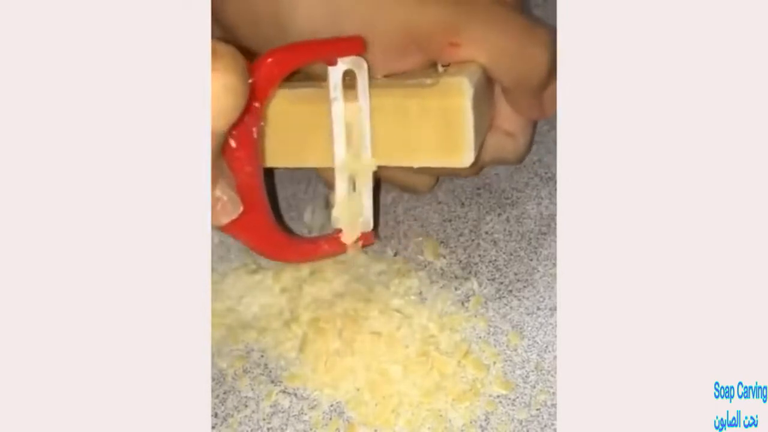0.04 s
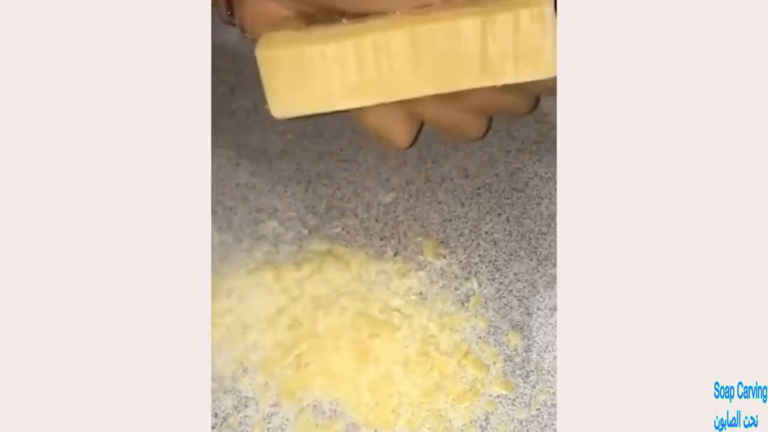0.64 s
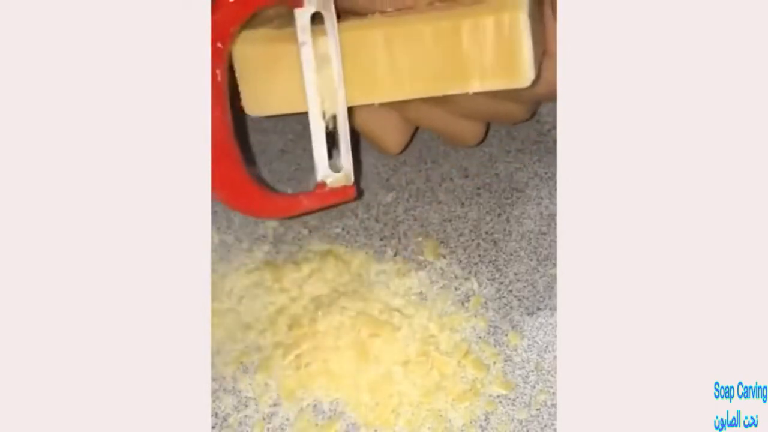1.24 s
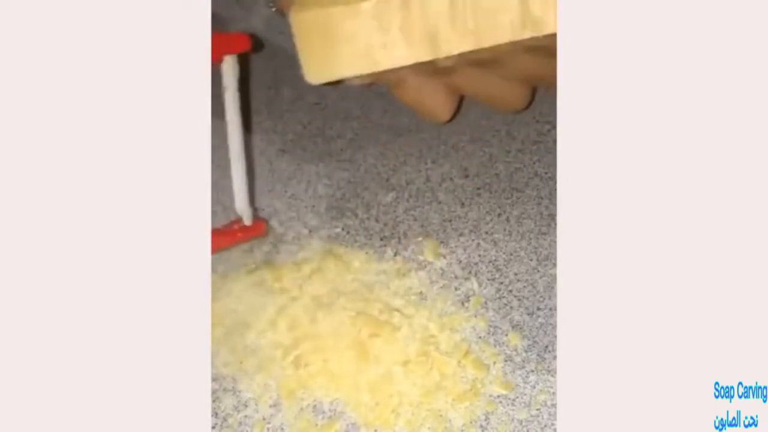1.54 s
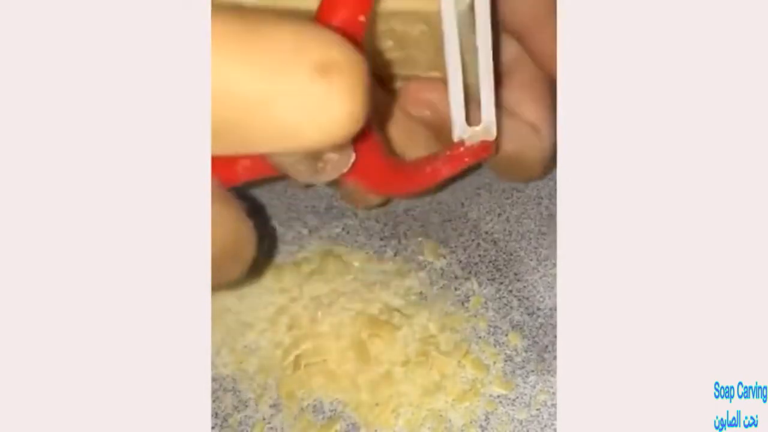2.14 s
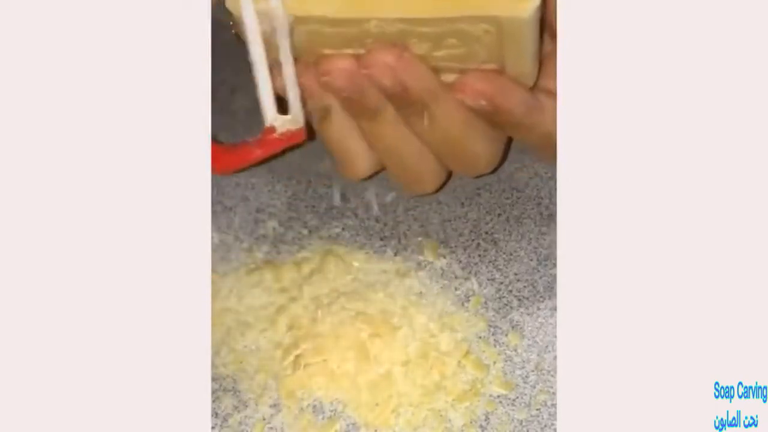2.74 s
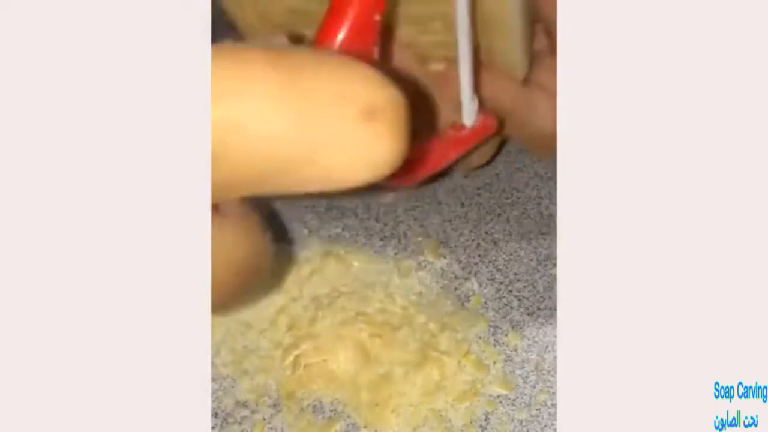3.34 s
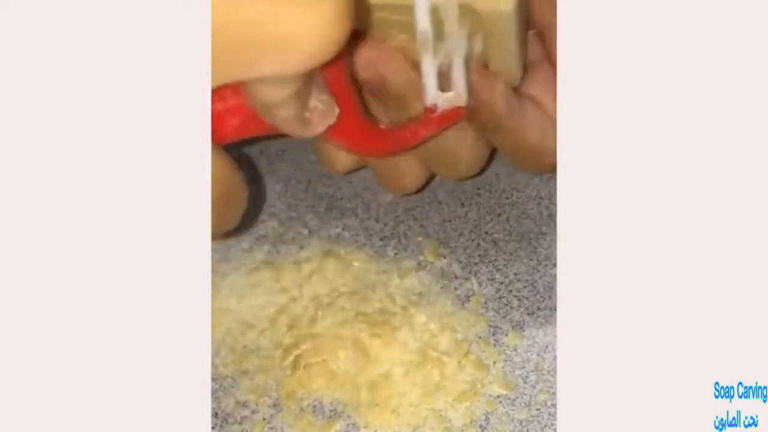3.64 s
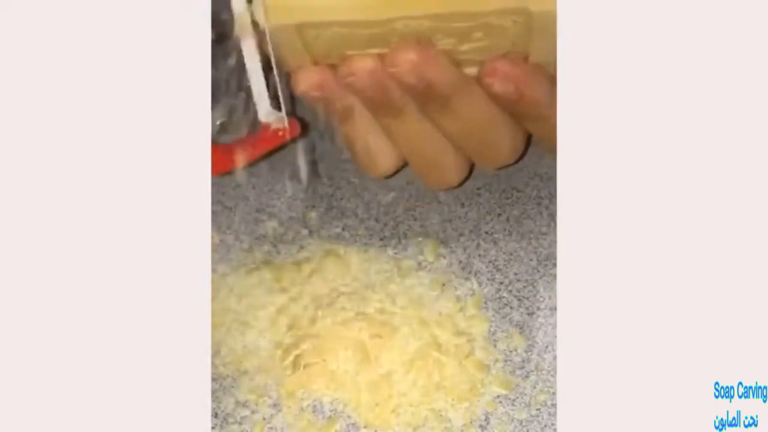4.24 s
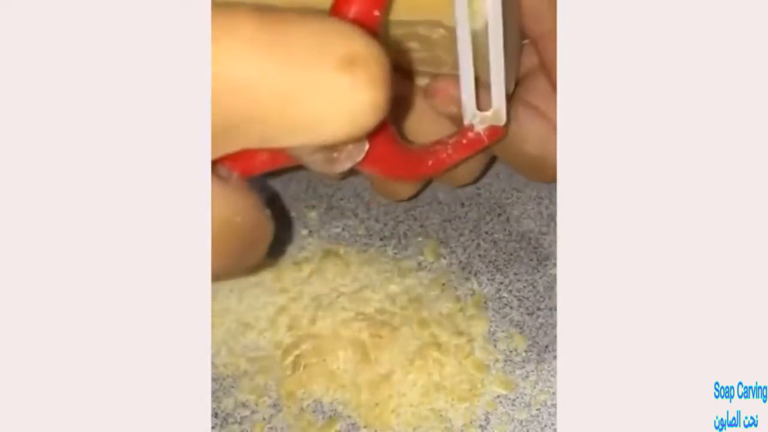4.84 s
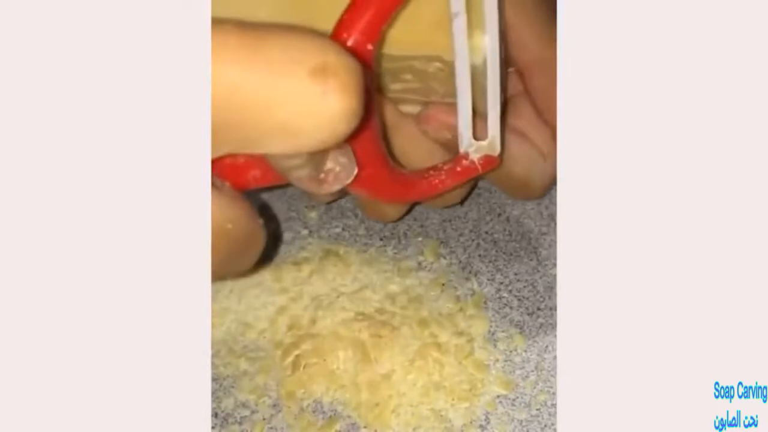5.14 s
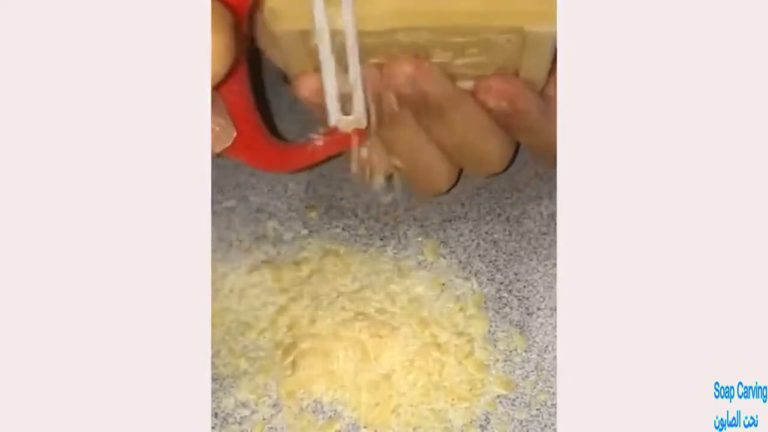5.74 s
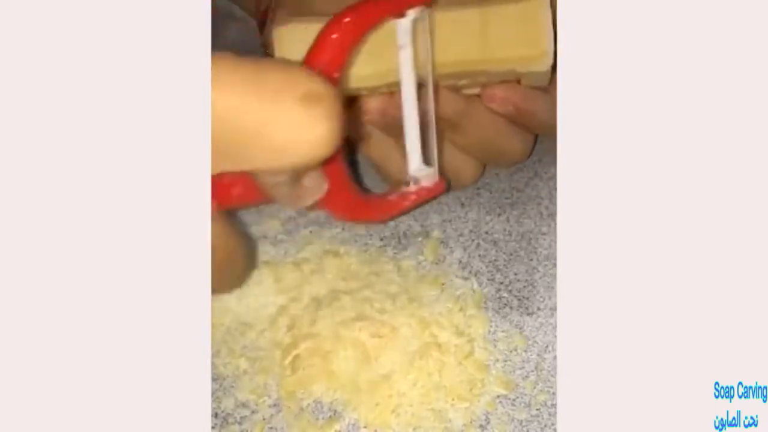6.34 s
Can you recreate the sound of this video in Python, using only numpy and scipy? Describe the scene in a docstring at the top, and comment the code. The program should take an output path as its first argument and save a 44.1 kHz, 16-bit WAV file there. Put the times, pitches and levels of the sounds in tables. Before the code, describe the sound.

Close, gritty rasps of a peeler shaving hard soap, broken by brief pauses, small cracks and sharp blade clicks.

```python
"""A swivel peeler shaves a hard, dry bar of soap held in the hand, close by in a small quiet room.
Dense tiny brittle fractures excite the resonances of peeler and bar, and stick-slip friction makes
the blade catch and chatter. Chips snap off, the bar knocks dully, and the loose blade clacks in its
plastic frame as it lands on the bar and leaves it. Faint air noise and mains hum lie underneath."""
import sys
import numpy as np
from scipy import signal
from scipy.fft import rfft, irfft
from scipy.io import wavfile
from scipy.ndimage import uniform_filter1d

SR = 44100
rng = np.random.default_rng(int(sys.argv[2]) if len(sys.argv) > 2 else 0)


def master(y):
    """Save y as 16-bit WAV."""
    cut = np.clip(np.atleast_2d(y).T, -1, 1)
    pcm = np.round(cut * 32767)  # scale
    wavfile.write(sys.argv[1], SR, pcm.astype(np.int16))


N = 282240
TIME = np.arange(N) / SR
CUTOFF_HZ = 13900


def scrape(strokes, colour, resonances, fractures_per_s, size_db, slips_per_s, slip_db,
           powder, gain_db, chatter_db, edge_s, rounding):
    """Source and filter: tiny fractures, bunched by stick and slip, excite peeler and bar."""
    touching, pressure, body_gain, catch_strength = bite(strokes, rounding, edge_s)
    sizes = from_db(size_db * np.minimum(rng.exponential(1, N), 4)) * rng.choice([-1, 1], N)
    fractures = rms_one(sizes * (rng.random(N) < fractures_per_s / SR))
    force = (fractures + powder * rng.standard_normal(N)) * from_db(slip_db * drift(slips_per_s))
    vibration = coloured(force, colour, resonances)
    blade = signal.sosfilt(signal.butter(4, 2700, "high", fs=SR, output="sos"), vibration)
    bar = signal.sosfilt(signal.butter(5, 2700, "low", fs=SR, output="sos"), vibration)
    sound = rms_one(blade) + body_gain * rms_one(bar)
    surges = stick_slip(catch_strength, chatter_db)
    return sound * touching * np.hypot(from_db(gain_db) * pressure, surges)


def edge_scrape():
    """Brittle fracture: the blade crumbles the crust of the bar's narrow edge."""
    # pushes: t/s, rise/s, fall/s, level/dB, swell/dB, fade/dB, relative body/dB, relative catches/dB
    strokes = [(0, .004, 0.091, -55, -4, 7.5, -6, 1.5), (.108, .17, .024, -30, 41, 24, -7, -6.5)]
    colour = [(100, -8.5), (400, -6.5), (1200, -3.5), (3000, -8), (4800, 3.5), (6800, 1), (10000, -1),
              (14000, 1)]  # spectral envelope: f/Hz, level/dB
    resonances = [(703, 43, 12), (1480, 200, 5.5), (2150, 390, 7.5), (3910, 460, 8.5), (5430, 390, 7),
                  (5940, 800, 4.5), (8200, 210, 8.5), (9480, 350, 9), (10460, 330, 2), (11570, 314, 9)]  # peeler and bar: f/Hz, width/Hz, lift/dB
    return scrape(strokes, colour, resonances, fractures_per_s=4000, size_db=2, slips_per_s=220,
                  slip_db=3, powder=.91, gain_db=-2.5, chatter_db=-3.5, edge_s=.004, rounding=1.05)


def smooth_scrape():
    """Friction-driven resonance: the blade glides over the fresh cut and nearly squeaks."""
    strokes = [(.87, 0.059, 0.082, -56.5, 8.8, 16.6, -7, 0), (1.062, 0.14, 0.0074, -27, 31.2, 20, -6.5, 0)]  # pushes: columns as in edge_scrape
    colour = [(100, -16), (400, -13.5), (1500, -13), (3400, -12.5), (4800, 0.5), (6400, 0), (10000, 5),
              (14000, 0)]  # spectral envelope: f/Hz, level/dB
    resonances = [(678, 32, 8.9), (1180, 310, 9.8), (1940, 380, 4.5), (4160, 750, 12), (5460, 210, 17),
                  (8200, 820, 5.7), (10740, 400, 6.3), (11480, 290, 9.6), (13100, 540, 7.2)]  # peeler and bar: f/Hz, width/Hz, lift/dB
    return scrape(strokes, colour, resonances, fractures_per_s=6000, size_db=3, slips_per_s=450,
                  slip_db=1.5, powder=.93, gain_db=-3, chatter_db=-11.5, edge_s=.0057, rounding=.91)


def face_scrape():
    """Brittle fracture along the broad face: more uneven breaks give a coarser grain."""
    strokes = [(2.045, 0.086, .09, -51.5, 4.4, 4.6, -7.5, 1), (2.225, 0.091, .1, -51.5, 3.3, 4.5, -7, -3),
               (2.425, 0.12, 0.055, -44, 15, 14.3, -3, 2.5), (3.366, 0.0061, 0.018, -35, 12.8, 9.4, -7, 2),
               (3.391, 0.018, 0.15, -41, 9.4, 30, -6.5, 6), (3.592, .01, 0.017, -48.5, 4.5, 12, -6, 6),
               (3.625, 0.12, 0.027, -53.5, 2, 42, -6.5, 1), (3.918, 0.017, 0.063, -32, 1, 20, -5, 6),
               (5.008, 0.011, 0.031, -37, 1.1, 21, -5.5, 8), (5.2, .17, 0.055, -54.5, 0.67, 5, -6, 7.5),
               (5.442, 0.082, 0.084, -43.5, 12.7, 20.7, -1, 0),
               (5.66, 0.037, 0.042, -56, 8.1, 9.6, -4.5, 7.5),
               (5.748, 0.029, 0.017, -47, 12, 12.5, -18, -6), (6.24, 0.16, .02, -68, 2, 1, -6.5, 12)]  # pushes: columns as in edge_scrape
    colour = [(100, -5), (450, -6.5), (1400, -7), (2900, -7.5), (4500, 5.5), (6400, 6.5), (9000, 8.5),
              (14000, 7.5)]  # spectral envelope: f/Hz, level/dB
    resonances = [(745, 67, 11.9), (1017, 170, 7.1), (1896, 130, 8.9), (2165, 130, 9.9), (3140, 110, 2.4),
                  (3494, 230, 6.8), (4037, 300, 14.2), (5315, 350, 10), (9060, 220, 4), (10330, 2200, 6.3)]  # peeler and bar: f/Hz, width/Hz, lift/dB
    return scrape(strokes, colour, resonances, fractures_per_s=4200, size_db=4, slips_per_s=190,
                  slip_db=1.1, powder=.62, gain_db=-1, chatter_db=-7.5, edge_s=.0012, rounding=.91)


def bite(strokes, rounding, edge_s, body_limit_db=-47.5):
    """Amplitude envelopes of the pushes: contact, pressure, the bar's share and the catches' strength."""
    out = np.zeros((4, N))
    for start, rise, fall, peak_db, swell_db, fade_db, body_db, catch_db in strokes:
        t = TIME - start
        touching = np.clip(np.minimum(t, rise + fall - t) / edge_s + 1, 0, 1)
        on = touching > 0
        to_go = np.clip(1 - t[on] / rise, 0, 1)
        gone = np.clip((t[on] - rise) / fall, 0, 1)
        level_db = peak_db - swell_db * to_go ** rounding - fade_db * gone ** rounding
        # the hand damps the bar: past the limit a deeper bite only gets brighter
        body = from_db(body_db) / np.hypot(1, from_db(level_db + body_db - body_limit_db))
        out[:, on] = touching[on], from_db(level_db), body, from_db(level_db + catch_db)
    return out


def stick_slip(catch_strength, chatter_db, catches_per_s=40, rise_s=.001, fall_s=.0035, count=600):
    """Relaxation oscillation: the edge sticks and jerks free, each catch ending in a quick surge."""
    # steady chatter where the soap is hardest: t/s, length/s, interval/s, level/dB
    chatters = [(0.1095, .073, 0.017, -32), (1.113, .012, .025, -26), (2.066, .105, .03, -36.5),
                (2.29, .118, 0.024, -37), (3.476, .04, 0.045, -29.5), (3.633, .084, 0.018, -28.5),
                (5.243, .156, .0208, -31.5), (5.4648, .033, 0.017, -31.5), (5.581, .027, 0.019, -41.5)]
    catches, t = np.zeros(N), np.arange(2048) / SR
    gaps, sizes = rng.standard_normal((2, count))
    times = np.cumsum(np.exp(.28 * gaps)) / catches_per_s  # light catches come at an uneven pace
    for s, db in zip(times[times < TIME[-1]], 3 * np.clip(sizes, -2, 1)):
        add(catches, s, from_db([db]))
    catches *= catch_strength * from_db(3.5)
    for start, length, interval, level_db in chatters:
        beats = np.arange(start, start + length, interval)
        for s, (late, harder) in zip(beats, rng.standard_normal((count, 2))):
            add(catches, s + .0005 * late, from_db([level_db + chatter_db + .6 * harder]))
    surge = (1 - np.exp(-t / rise_s)) * np.exp(-t / fall_s)
    return signal.fftconvolve(catches, surge)[:N]


def clacks():
    """Impact: the blade hits its stop and rings with the frame. Returns direct sound and room feed."""
    # t/s, level/dB, lower ring f/Hz, upper ring f/Hz, low weight/dB, top weight/dB, contact/s
    impacts = [(0.279, -22.5, 5680, 8600, -16.5, 1, 0.0049), (0.7848, -43, 5470, 11550, -19, -10, 0.0028),
               (0.7974, -33, 5070, 11200, -12.5, 0, 0.0034), (1.8747, -38.5, 3840, 9340, -22, -1, 0.0028),
               (2.664, -33, 5140, 10700, -18.5, -2, .0027), (3.2049, -32, 6200, 12100, -9, 10, 0.0026),
               (3.904, -28, 3950, 9200, -8.5, -2.5, 0.0031), (3.9194, -20.5, 5500, 11400, -21.5, 4, .002),
               (3.926, -20, 4960, 11500, -10, 0.5, 0.0016), (3.936, -27, 4960, 11370, -4.5, 1.5, 0.0033),
               (4.1072, -15.5, 7180, 13000, -18, 4.5, .0008), (4.558, -37.5, 6410, 11560, -17, 6.5, 0.0014),
               (5.006, -19, 5120, 10700, -18.5, -4, .002), (5.0203, -26, 5200, 10350, -18, -3.5, .0015),
               (6.2324, -28.5, 5630, 10530, -18, 4.5, 0.0047)]
    colour = [(100, -35), (700, -10), (1900, -10.5), (2700, -7.5), (4600, 5.5), (7500, 0.5), (10500, 5),
              (14000, 0)]  # spectral envelope: f/Hz, level/dB
    frame = [(2030, 250, 5.5)]  # plastic frame: f/Hz, width/Hz, lift/dB
    beamed, spread = np.zeros((2, N))
    for s, level_db, lower_hz, upper_hz, low_db, top_db, length in impacts:
        blade = [(lower_hz, 400, 12.5), (upper_hz, 800, 10)]  # columns as for the frame
        contact = burst(length, rattle_db=-10, rattle_s=1.8 * length)
        # the thin blade's rings are directional and stay out of the room
        for out, resonances in ((beamed, [*frame, *blade]), (spread, frame)):
            knock = coloured(contact, colour, resonances)
            add(out, s, from_db(level_db) * voiced(knock, low_db - 1, top_db))
        frame_db = level_db - 12 - 3500 * length  # a longer, softer contact rings the frame less
        add(beamed, s, ring(frame_db, hz=1880, t60=.026))
        add(beamed, s, ring(level_db - 16, lower_hz, t60=.015))  # the blade's lingering ping
    return beamed, from_db(-2.5) * band(spread, 5170, CUTOFF_HZ, order=2)  # mostly treble spreads


def chips():
    """Sudden release of strain: each chip of soap breaks away with a short dry crack."""
    snaps = [(.011, -44, -2), (0.0554, -39, 9), (0.1285, -45, -5), (0.1426, -44, -1), (.1916, -34.5, 6),
             (0.2152, -35.5, -4), (.233, -34.5, -6), (0.3394, -32, 3.5), (1.5457, -55.5, 6),
             (1.8922, -45, -4), (2.6015, -39.5, 6), (3.1793, -42, -5), (3.326, -51.5, 4.5),
             (3.6896, -41, 5), (3.822, -55, 9.5), (3.864, -44.5, 21), (4.1024, -34.5, 2.5),
             (4.1302, -34.5, 3), (4.1737, -53.5, 10.5), (4.546, -43.5, -10), (4.6241, -48, -6.5),
             (5.261, -37, 11), (5.771, -41, 0.5)]  # t/s, level/dB, crispness (top over middle)/dB
    colour = [(100, -20), (450, -7), (1000, -6), (2500, -9), (5000, 11), (7000, 0.5), (11000, 7.5),
              (14000, 4)]  # spectral envelope: f/Hz, level/dB
    out = np.zeros(N)
    for s, level_db, crisp_db in snaps:
        length = .0016 * from_db(-.23 * crisp_db)  # a crisper chip breaks faster
        body_db = -10.5 + .36 * crisp_db  # and rings the blade less, so its low body stands out
        crack = coloured(burst(length, rattle_db=-8, rattle_s=.0092), colour)
        add(out, s, from_db(level_db) * voiced(crack, body_db, crisp_db))
    return out


def knocks():
    """Modal damping: the blade is set down and the bar rings dully, damped by the hand."""
    landings = [(4.13, -40), (4.19, -55.5), (4.234, -53), (5.199, -28.5)]  # t/s, level/dB
    bar_modes = [(783, -5, 0.033), (970, -13.5, .02), (1230, -2, 0.013), (1580, -8, 0.011)]  # f/Hz, relative level/dB, T60/s
    out = np.zeros(N)
    for s, level_db in landings:
        for k, (hz, db, t60) in enumerate(bar_modes):
            add(out, s, (-1) ** k * ring(level_db + db, hz, t60))
    return out


def ticks():
    """Free vibration: short pitched ticks and pings of the frame or blade, one mode each, heard dry."""
    pings = [(0.339, -33.5, 2520, 0.022), (1.546, -58.5, 2080, .029), (1.743, -60, 1670, 0.022),
             (1.79, -59, 1880, .029), (3.18, -52, 1900, 0.062), (3.936, -42.5, 2926, 0.18),
             (4.109, -26, 3050, 0.013), (5.021, -46, 5410, 0.16), (6.234, -30.5, 5520, 0.033)]  # t/s, level/dB, f/Hz, T60/s
    out = np.zeros(N)
    for s, level_db, hz, t60 in pings:
        add(out, s, ring(level_db, hz, t60))
    return out


def room(x, build_s=.002):
    """Reverberation: diffuse reflections build up quickly and die away, slowest in the bass."""
    colour = [(200, -30.5), (800, -13.5), (2000, -13), (2950, -5), (3800, -10), (4700, -21), (5500, -19),
              (7000, -19.5), (10000, -20.5), (13500, -16)]  # response of the room: f/Hz, level/dB
    decay_times = [(200, 0.66), (3500, 0.42), (8000, 0.54), (14000, .45)]  # f/Hz, T60/s
    t = np.arange(SR) / SR
    edges = np.geomspace(150, 16000, 9)
    tail = 0
    for low, high in zip(edges, edges[1:]):
        t60 = at_hz(decay_times, np.sqrt(low * high))
        envelope = from_db(-60 * t / t60) * (1 - np.exp(-t / build_s))
        tail += band(rng.standard_normal(SR), low, high) * envelope / np.sqrt(np.sum(envelope ** 2))
    return signal.fftconvolve(x, coloured(tail, colour))[:N]


def background():
    """Noise floor: still air, a rumble as the hands move, mains hum and two faint passing tones."""
    air_colour = [(15, -34), (25, 2), (70, -4), (104, -9), (195, -14.5), (441, -16), (727, -21.5),
                  (807, -15.5), (921, -25.5), (997, -23), (1830, -27.5), (13500, -30)]  # spectrum of still air: f/Hz, relative level/dB
    stirs = [(.17, .2, -64), (3.736, 0.27, -69)]  # the hands stir the air: middle t/s, half length/s, level/dB
    low_tones = [(1.792, 0.068, 253, -69.5), (3.067, 0.043, 258, -71)]  # middle t/s, half length/s, f/Hz, level/dB
    air = from_db(-67.5) * rms_one(coloured(rng.standard_normal(N), air_colour))
    low_noise = rms_one(band(rng.standard_normal(N), 25, 86, order=2))
    rumble = low_noise * sum(from_db(db) * swell_at(s, half) for s, half, db in stirs)
    hum = from_db(-78.5) * sine(hz=98.6)
    tones = sum(from_db(db) * swell_at(s, half) * sine(hz) for s, half, hz, db in low_tones)
    return air + rumble + hum + tones


def burst(length, rattle_db, rattle_s, size=4096):
    """Impulsive excitation: a crush of micro-contacts swells and dies, then a weaker rattle."""
    t = np.arange(size) / SR
    swell = t / max(length, 1e-4)
    crush = 2 * swell * np.exp(1 - 2 * swell)
    rattle = from_db(rattle_db) * np.exp(-t / rattle_s) * np.tanh(swell)
    return (crush + rattle) * rng.choice([-1, 1], size)


def ring(level_db, hz, t60, contact_s=.00048):
    """Damped oscillator: one mode, set going by a soft contact."""
    t = np.arange(8192) / SR
    return from_db(level_db - 60 * t / t60) * np.sin(2 * np.pi * hz * t) * (1 - np.exp(-t / contact_s))


def voiced(x, low_db, top_db):
    """Band weighting of a hit's body and top against its middle; the loudest 2 ms have rms 1."""
    bands_hz = [(300, 2700), (2700, 7700), (7700, 14000)]
    low, middle, top = (rms_one(band(x, *edges, order=4)) for edges in bands_hz)
    hit = from_db(low_db) * low + middle + from_db(top_db) * top
    return hit / np.sqrt(uniform_filter1d(hit ** 2, 88).max())


def coloured(x, spectrum, resonances=(), size=4096):
    """Minimum-phase filter: a broad spectrum with resonant peaks or dips on it."""
    hz = np.arange(size // 2 + 1) * SR / size
    gain = from_db(at_hz(spectrum, hz))
    for centre, width, lift in resonances:
        gain *= np.sqrt(1 + (from_db(lift) ** 2 - 1) / (1 + (2 * (hz - centre) / width) ** 2))
    cepstrum = irfft(np.log(gain))[:size // 2]
    cepstrum[1:] *= 2
    return signal.fftconvolve(x, irfft(np.exp(rfft(cepstrum, size))))[:len(x)]


def band(x, low_hz, high_hz, order=3):
    """Butterworth band-pass."""
    return signal.sosfilt(signal.butter(order, [low_hz, high_hz], "band", fs=SR, output="sos"), x)


def at_hz(points, hz):
    """Interpolation on a log-frequency axis."""
    f, value = np.transpose(points)
    return np.interp(np.log(np.maximum(hz, 1)), np.log(f), value)


def drift(rate):
    """Random modulation through `rate` values a second, rms 1."""
    return rms_one(np.interp(TIME * rate, np.arange(N), rng.standard_normal(N)))


def swell_at(s, half_s):
    """Gaussian envelope of height 1 around time s."""
    return np.exp(-((TIME - s) / half_s) ** 2)


def sine(hz):
    """Pure tone, rms 1."""
    return rms_one(np.sin(2 * np.pi * hz * TIME))


def add(out, s, sound):
    """Superpose a short sound at time s."""
    start = max(round(s * SR), 0)
    out[start:start + len(sound)] += sound[:N - start]


def from_db(db):
    """Decibels to gain."""
    return 10 ** (np.asarray(db) / 20)


def rms_one(x):
    """Scale to rms 1."""
    return x / np.sqrt(np.mean(x ** 2) + 1e-20)


def scene():
    """Superposition of the direct sound of peeler and soap, its reflections and the background."""
    edge, smooth, face = edge_scrape(), smooth_scrape(), face_scrape()
    soap = edge + face + chips() + knocks()
    beamed, spread = clacks()
    # the near-squeak is directional, so the room gets the smooth strokes with it turned down
    off_axis = [(1000, -2.2), (3500, .31), (7000, -.76), (14000, -1.6)]  # f/Hz, level/dB
    squeak_dips = [(5430, 770, -7), (11600, 500, -8)]  # f/Hz, width/Hz, lift/dB
    reflections = room(soap + coloured(smooth, off_axis, squeak_dips) + spread)
    return (soap + smooth + beamed + ticks() + reflections + background())[None]


def record(dry):
    """Band limiting: an elliptic low-pass cuts the top steeply."""
    return signal.sosfilt(signal.ellip(10, .3, 70, CUTOFF_HZ, fs=SR, output="sos"), dry)


dry = scene()
out = record(dry)
master(out)
```